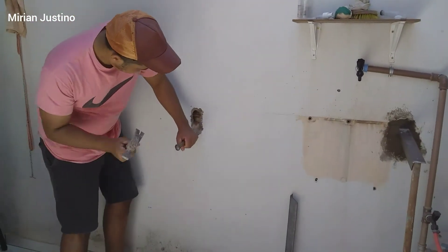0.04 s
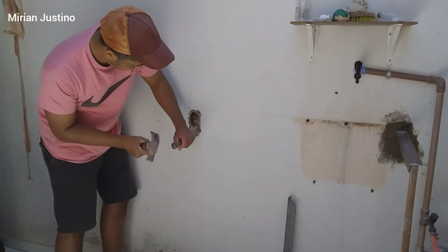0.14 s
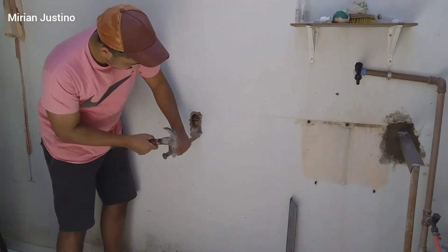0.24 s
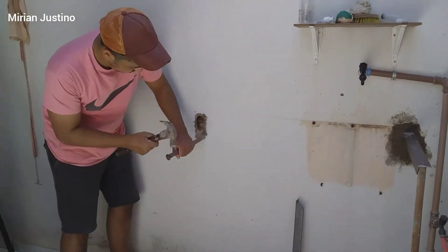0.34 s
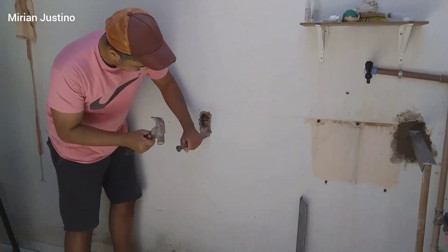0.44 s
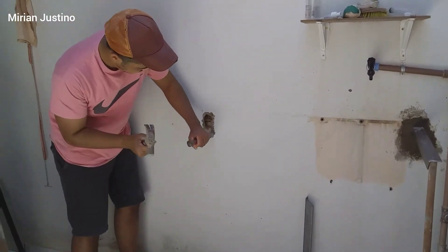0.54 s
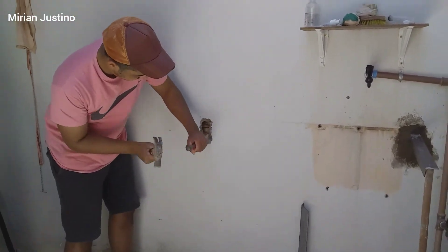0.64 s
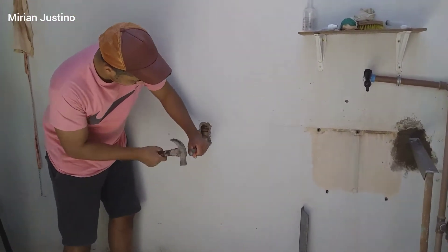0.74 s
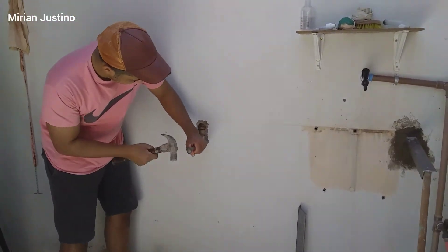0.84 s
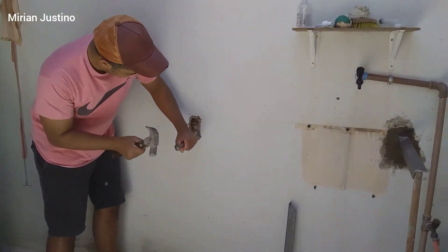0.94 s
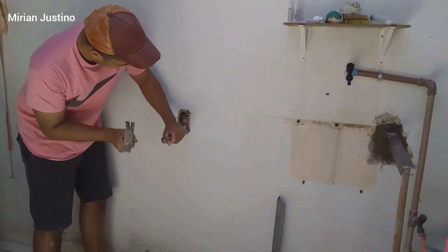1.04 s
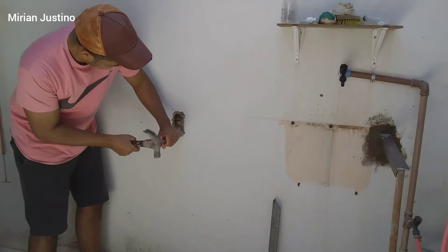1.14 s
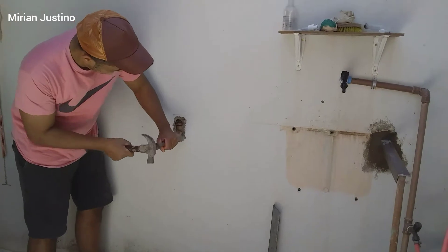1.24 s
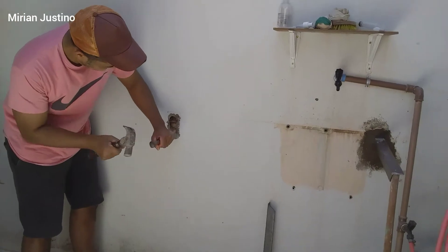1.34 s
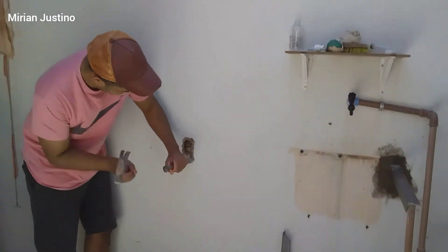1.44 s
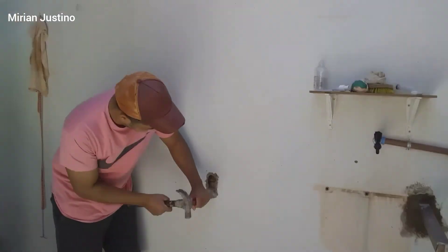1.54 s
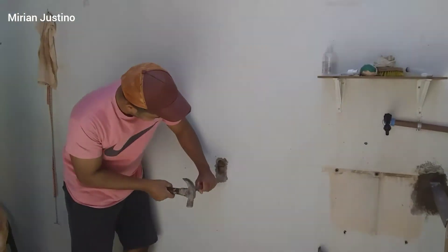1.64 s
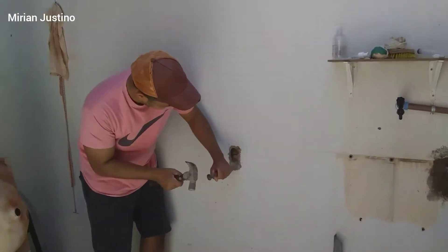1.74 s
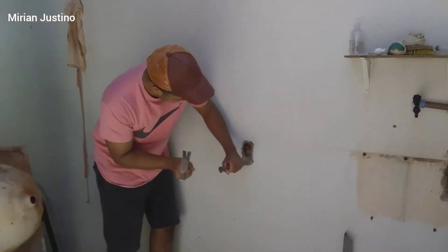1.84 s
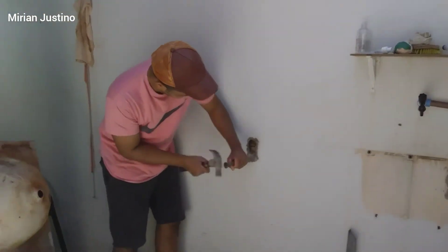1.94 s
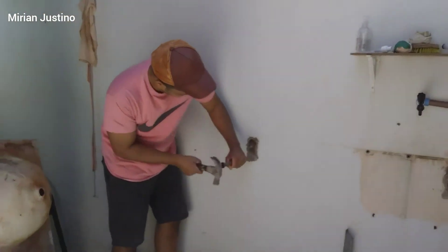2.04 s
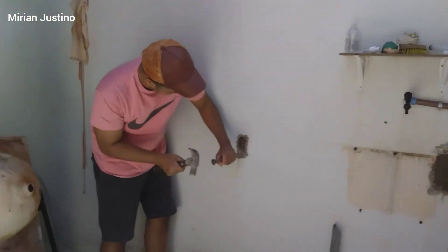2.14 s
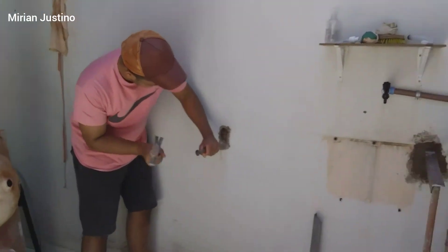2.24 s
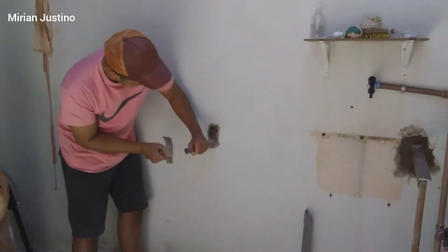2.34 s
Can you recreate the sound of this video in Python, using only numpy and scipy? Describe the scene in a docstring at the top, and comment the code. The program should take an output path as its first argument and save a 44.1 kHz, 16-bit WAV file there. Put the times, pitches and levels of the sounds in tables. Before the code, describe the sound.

Five hard metallic hammer blows on a chisel crack into brick, echoing briefly off bare walls

```python
"""A hammer drives a steel chisel into a brick wall, five blows in a small bare room.
Each blow layers noise of crushed brick, a thud and a sweeping thump of the wall, and decaying modes
of the steel, with room echoes of shaped noise. Scrapes of clicks, knocks of falling chips and two
faint chirps lie between, over room tone. The recorder's limiter holds the blows down."""
import sys
import numpy as np
from scipy import signal
from scipy.fft import rfft, irfft, next_fast_len
from scipy.io import wavfile
from scipy.ndimage import uniform_filter1d

SR = 44100
rng = np.random.default_rng(int(sys.argv[2]) if len(sys.argv) > 2 else 0)


def store_pcm(level_fs):
    """Save levels as 16-bit WAV."""
    pcm = np.round(np.clip(level_fs, -1, 1) * 32767).astype(np.int16)
    wavfile.write(sys.argv[1], SR, np.atleast_2d(pcm).T)


N = 103635  # samples
T = np.arange(SR) / SR  # one second, the time axis of each event [s]

# spectrum of crumbling brick: (frequency [Hz], relative density [dB per Hz])
GRIT_SPECTRUM = [(100, -28.5), (400, -16), (1000, -11), (1700, -5.5), (2200, -10), (2800, -5.5), (4400, -1),
                 (7000, -2), (11000, -7), (15500, -9)]


def from_db(db):
    """Decibels to gain."""
    return 10 ** (np.asarray(db) / 20)


def at_hz(points, hz):
    """Interpolate a table on a log-frequency axis."""
    p = np.array(points)
    return np.interp(np.log(np.maximum(hz, 1)), np.log(p[:, 0]), p[:, 1])


def unit(x):
    """Scale to the energy of 50 ms at rms 1."""
    return x / np.sqrt(np.sum(x ** 2) / (.05 * SR) + 1e-20)


def add(out, time_s, x):
    """Mix x into out from time_s."""
    i = max(int(time_s * SR), 0)
    out[i:i + len(x)] += x[:N - i]


def colour(x, points, tilt_db=0):
    """Minimum-phase filter to a spectrum, tilted by tilt_db per octave above 1500 Hz."""
    size = next_fast_len(2 * len(x), real=True)
    hz = np.arange(size // 2 + 1) * SR / size
    db = at_hz(points, hz) + tilt_db * np.log2(np.maximum(hz / 1500, 1))
    # folding the cepstrum onto positive time makes the filter causal
    cepstrum = irfft(np.log(from_db(db)), size)
    cepstrum[1:size // 2] *= 2
    cepstrum[size // 2 + 1:] = 0
    response = np.exp(rfft(cepstrum))
    return irfft(rfft(x, size) * response, size)[:len(x)]


def burst(rise_s, decay_s):
    """Rush of tiny fractures: noise with a linear rise and an exponential decay."""
    decay = np.exp(-np.maximum(T - rise_s, 0) / decay_s)
    return rng.standard_normal(SR) * np.minimum(T / rise_s, 1) * decay


def mode(hz, t60_s):
    """One struck resonance: a decaying sine of random phase."""
    rise_s = 0.0049
    sine = np.sin(2 * np.pi * (hz * T + rng.random()))
    return sine * from_db(-60 * T / t60_s) * np.minimum(T / rise_s, 1)


def room():
    """Dense echoes of bare walls: noise bands, strong early on, each with its own decay."""
    # (frequency [Hz], t60 [s])
    decay_table = [(60, 1), (180, 0.6), (500, 0.55), (1200, 0.47), (3000, 0.38), (5500, 0.36), (9000, 0.29),
                   (15000, 0.2)]
    gap_s, build_s = 0.0028, 0.0055
    early_db, early_decay_s = 10, 0.037
    edges_hz = np.geomspace(25, 19000, 15)
    white, out = rng.standard_normal((2, SR)), 0
    early = 1 + from_db(early_db) * np.exp(-T / early_decay_s)
    onset = np.clip((T - gap_s) / build_s, 0, 1)
    for k, (low, high) in enumerate(zip(edges_hz, edges_hz[1:])):
        band_pass = signal.butter(2, [low, high], "band", fs=SR, output="sos")
        band = signal.sosfilt(band_pass, white[k % 2])
        tail = from_db(-60 * T / at_hz(decay_table, np.sqrt(low * high)))
        out = out + np.sqrt(high - low) * unit(band * tail * early * onset)
    return out


def in_room(x, echoes, direct_db, room_db):
    """Direct sound plus its echoes, each normalised to its own level."""
    reverberant = signal.fftconvolve(x, echoes)[:len(x)]
    return from_db(direct_db) * unit(x) + from_db(room_db) * unit(reverberant)


def room_tone():
    """Steady background: noise filtered to a fixed spectrum."""
    # (frequency [Hz], relative density [dB per Hz])
    tone_spectrum = [(25, -37), (55, 1.5), (80, -7.5), (115, 10), (170, -2.5), (380, -4.5), (800, -18.5),
                     (1500, -28), (4500, -17), (9000, -30.5), (15500, -38.5)]
    rms_db = -66
    tone = colour(rng.standard_normal(N), tone_spectrum)
    return from_db(rms_db) * tone / tone.std()


def chirps(echoes):
    """Faint high whistles: sines arched in level and pitch, with a random waver."""
    # (time [s], length [s], centre pitch [Hz], level [dB])
    chirp_table = [(0.467, .028, 6200, -59.5), (0.517, 0.055, 6230, -56.5)]
    bend, waver_depth, waver_s = .02, 0.018, .002  # bend and rms waver as shares of the pitch
    out = np.zeros(N)
    for time_s, length_s, hz, db in chirp_table:
        arch = np.sin(np.pi * np.minimum(T / length_s, 1))
        waver = uniform_filter1d(rng.standard_normal(SR), max(int(waver_s * SR), 1))
        pitch_hz = hz * (1 + bend * (arch - .5) + waver_depth * waver / waver.std())
        whistle = arch * np.sin(2 * np.pi * np.cumsum(pitch_hz) / SR)
        add(out, time_s, from_db(db) * in_room(whistle, echoes, direct_db=-3, room_db=-4))
    return out


def chips(echoes):
    """Chips knock against wall and floor: short bursts of coloured noise."""
    # (time [s], level [dB], treble tilt [dB per octave])
    chip_table = [(.018, -66.5, 3), (0.687, -53, 14), (2.203, -56.5, -8), (2.227, -58.5, -10.5),
                  (2.2861, -42.5, -0.2)]
    out = np.zeros(N)
    for time_s, db, tilt_db in chip_table:
        knock = colour(burst(rise_s=.002, decay_s=0.017), GRIT_SPECTRUM, tilt_db)
        add(out, time_s, from_db(db) * in_room(knock, echoes, direct_db=-1.5, room_db=-5.5))
    return out


def grains(per_s, count):
    """Random clicks of uneven size and either sign, per_s on average."""
    spread_db = 5
    sizes = from_db(spread_db * np.minimum(rng.exponential(1, count), 4))
    return (rng.random(count) < per_s / SR) * sizes * rng.choice([-1, 1], count)


def scrapes(echoes):
    """The tip shifts in the hole: arched strokes of grit clicks."""
    # (time [s], length [s], level [dB])
    scrape_table = [(.003, 0.36, -63.5), (0.176, 0.089, -40), (0.437, 0.22, -66), (0.561, .11, -55),
                    (0.659, 0.043, -54), (1.409, 0.084, -71)]
    out = np.zeros(N)
    for time_s, length_s, db in scrape_table:
        arch = np.sin(np.pi * np.minimum(T / length_s, 1))
        stroke = colour(grains(800, SR) * arch, GRIT_SPECTRUM)
        add(out, time_s, from_db(db) * in_room(stroke, echoes, direct_db=-10, room_db=1.5))
    return out


def wall_thump():
    """Bending wave in the wall: delay goes as 1/sqrt(frequency), so one push becomes a falling sweep."""
    # (frequency [Hz], relative density [dB per Hz])
    thump_spectrum = [(25, -25.5), (60, -4.5), (120, -1.5), (250, -1.5), (500, -6.5), (900, -1.5),
                      (1400, -10), (3000, -26.5)]
    lag_at_100hz_s = 0.011
    hz = np.arange(SR // 2 + 1)
    sweep = irfft(np.exp(-4j * np.pi * lag_at_100hz_s * 10 * np.sqrt(hz)), SR)
    return unit(colour(sweep * (T < .5), thump_spectrum))


def wall_thud(echoes):
    """The wall's response: coloured echoes plus low resonances of wall and room."""
    # (frequency [Hz], relative density [dB per Hz])
    thud_spectrum = [(25, -41.5), (55, -4.5), (100, -4), (190, 3), (260, -2.5), (450, 3), (680, 2.5),
                     (950, -2.5), (1250, -31), (2500, -24)]
    # (frequency [Hz], level [dB], t60 [s])
    wall_modes = [(178.35, -12.5, 0.3), (293.2, -14.5, .3), (464.4, -11, .3), (672, -17, .22),
                  (882.2, -16, .15)]
    room_db = -3.5
    thud = from_db(room_db) * unit(colour(echoes, thud_spectrum))
    for hz, db, t60_s in wall_modes:
        thud = thud + from_db(db) * unit(mode(hz, t60_s))
    return thud


def add_crack(out, time_s, level_db, tilt_db, crush_s, echoes):
    """Brick crushes in a noise burst with echoes, after a faint soft lead-in of noise."""
    # (frequency [Hz], relative density [dB per Hz])
    crack_spectrum = [(40, -34), (200, -14), (700, -5), (1250, -3), (2000, -1.5), (3000, 4.5), (3900, -2.5),
                      (5300, 7), (6700, -7), (8300, -4.5), (10500, -12), (15500, -13)]
    rise_s, lead_in_s = 0.0023, .005
    lead_in_db, direct_db, room_db = -23, -0.5, -2.5
    lead_in = unit(colour(burst(rise_s, crush_s), crack_spectrum))
    direct = unit(colour(burst(rise_s, crush_s), crack_spectrum, tilt_db))
    reverberant = unit(colour(echoes, crack_spectrum, tilt_db))
    add(out, time_s - lead_in_s, from_db(level_db + lead_in_db) * lead_in)
    add(out, time_s, from_db(level_db + direct_db) * direct)
    add(out, time_s, from_db(level_db + room_db) * reverberant)


def steel_ring(level_db, t60_share, favour_db, echoes):
    """Modes of chisel and hammer head; the strike favours the first five differently each time."""
    # one entry per mode, the five main ones first: (frequency [Hz])
    steel_hz = [2884, 4593, 4702, 4938, 5781, 2345, 2752, 3524, 3862, 5263, 5420, 5640, 7495, 8220, 9372,
                10535, 11900]
    # (relative level [dB])
    steel_db = [-2.5, -4, -11.5, -14, -2.5, -23, -16.5, -21, -18.5, -17.5, -16, -20, -33, -20.5, -22, -24.5,
                -22]
    # (t60 at a share of 1 [s])
    steel_t60_s = [0.089, 0.11, 0.11, 0.061, 0.16, 0.058, .08, 0.1, 0.028, 0.047, 0.037, 0.062, 0.063, .04,
                   0.065, 0.065, 0.036]
    ring = np.zeros(SR)
    for k, (hz, db, t60_s) in enumerate(zip(steel_hz, steel_db, steel_t60_s)):
        mode_db = level_db + db + (favour_db[k] if k < len(favour_db) else 0)
        partial = in_room(mode(hz, t60_s * t60_share), echoes, direct_db=0.5, room_db=-0.5)
        ring += from_db(mode_db) * unit(partial)
    return ring


def blows():
    """Crack, thump, thud and ring; the microphone moves, so each blow meets other echoes."""
    # (time [s], crack [dB], wall thud [dB], dull thump [dB], crack treble tilt [dB per octave],
    #  crush decay [s], ring [dB], share of the steel t60 [1])
    blow_table = [(0.2309, -15.5, -17, -42, -3, .014, -11.5, 0.76),
                  (0.7418, -13, -20.5, -30.5, -0.27, 0.0055, -11.5, 0.9),
                  (1.169, -20, -24.5, -23.5, .2, 0.0094, -15, 0.58),
                  (1.582, -19.5, -27, -28, 1.33, 0.0069, -22, 0.63),
                  (2.001, -21.5, -28.5, -24, 0, 0.011, -15, 0.74)]
    # one row per blow: (gain of steel mode 1, 2, 3, 4, 5 [dB])
    strike_colour = [(1.5, 0.5, -6, 8.5, -10.5), (-1, -3, -2, -13.5, -0.5), (-3.5, 4, 5, -35, -3),
                     (-12, 0, -5, 11, 8.5), (-6, -5.5, 2.5, -18, 1)]
    thump_lag_s, thud_lag_s = 0.0022, 0.0027
    out, push = np.zeros(N), wall_thump()
    for blow, favour_db in zip(blow_table, strike_colour):
        time_s, crack_db, thud_db, thump_db, tilt_db, crush_s, ring_db, t60_share = blow
        echoes = room()
        add_crack(out, time_s, crack_db, tilt_db, crush_s, echoes)
        add(out, time_s + thump_lag_s, from_db(thump_db) * push)
        add(out, time_s + thud_lag_s, from_db(thud_db) * wall_thud(echoes))
        add(out, time_s, steel_ring(ring_db, t60_share, favour_db, echoes))
    return out


def stereo(mid):
    """Widen mostly the top treble: a scattered copy is added left and subtracted right."""
    # (frequency [Hz], side against mid [dB])
    width_table = [(100, -60), (3000, -40), (5500, -27), (8500, -12), (13000, -6)]
    scatter = burst(rise_s=0.00073, decay_s=.004)
    scattered = signal.fftconvolve(mid, scatter / np.linalg.norm(scatter))[:N]
    side = colour(scattered, width_table)
    return np.array([mid + side, mid - side])


def scene():
    """Sum the sources in the middle, then spread the treble."""
    echoes = room()
    background = room_tone() + chirps(echoes)
    debris = chips(echoes) + scrapes(echoes)
    return stereo(background + debris + blows())


def record(dry):
    """Fast limiter with a linear-in-dB release, rounded peaks and a steep top cut."""
    limit_db, attack_s, release_db_per_s = -12.5, 0.0018, 450
    ceiling, cutoff_hz = 0.81, 15900
    pole = np.exp(-1 / (attack_s * SR))
    power = signal.lfilter([1 - pole], [1, -pole], np.mean(dry ** 2, axis=0))
    over_db = np.maximum(10 * np.log10(power + 1e-12) - limit_db, 0)
    # running maximum against a ramp: instant hold, steady release
    ramp_db = release_db_per_s * np.arange(N) / SR
    gain_db = ramp_db - np.maximum.accumulate(over_db + ramp_db)
    rounded = ceiling * np.tanh(dry * from_db(gain_db) / ceiling)
    top_cut = signal.ellip(10, .2, 70, cutoff_hz, fs=SR, output="sos")
    return signal.sosfilt(top_cut, rounded)


dry = scene()
out = record(dry)
store_pcm(out)
```